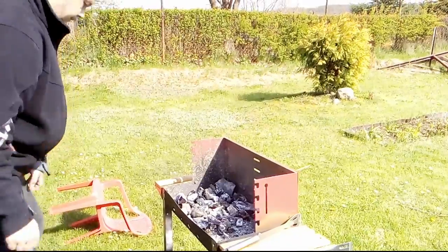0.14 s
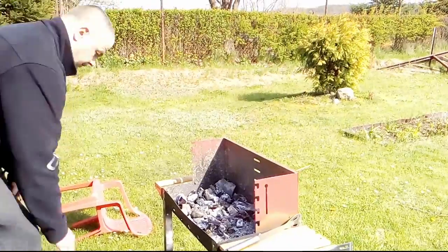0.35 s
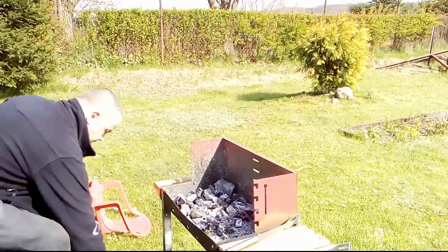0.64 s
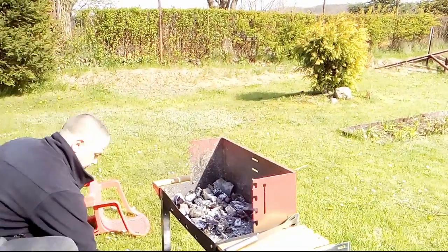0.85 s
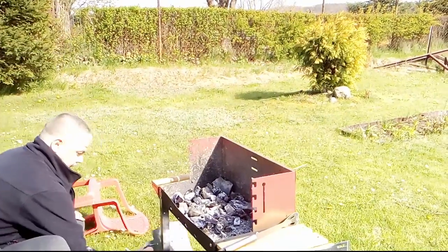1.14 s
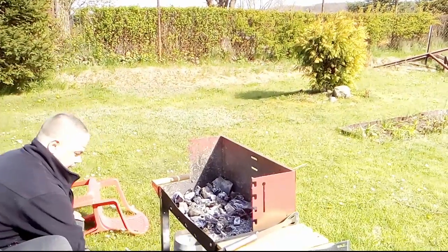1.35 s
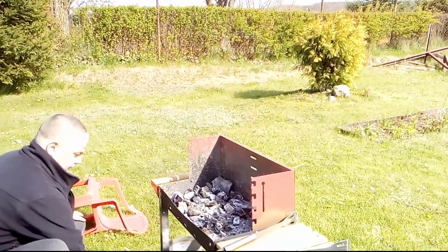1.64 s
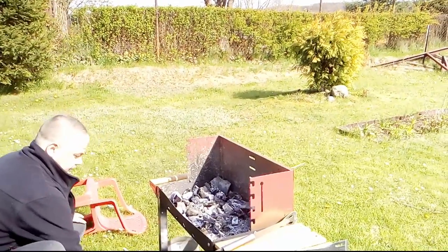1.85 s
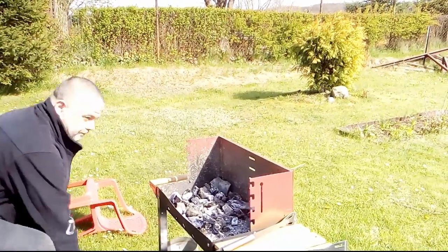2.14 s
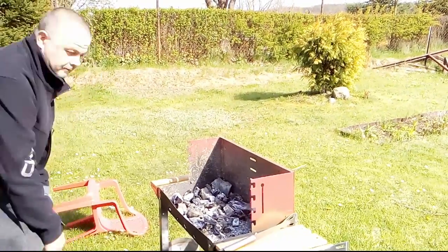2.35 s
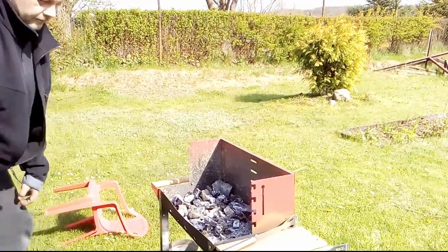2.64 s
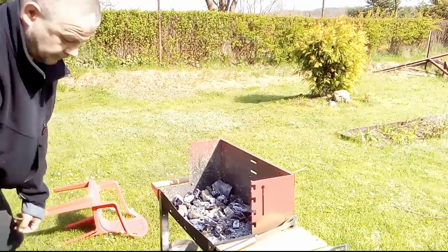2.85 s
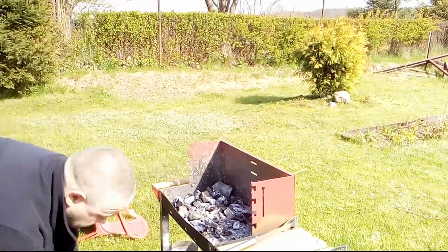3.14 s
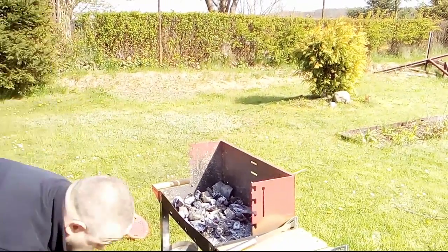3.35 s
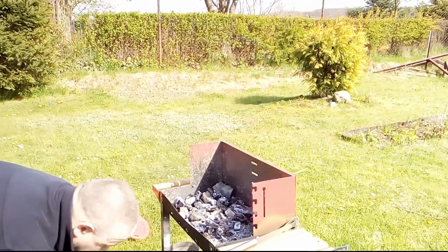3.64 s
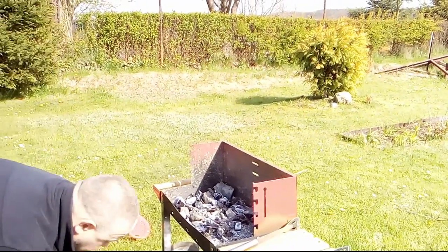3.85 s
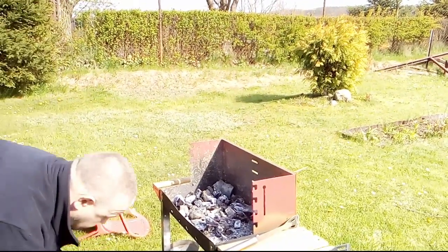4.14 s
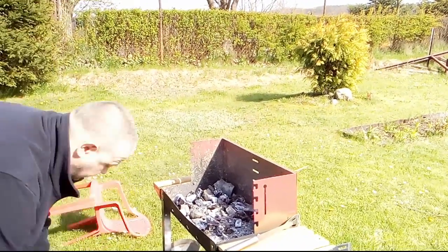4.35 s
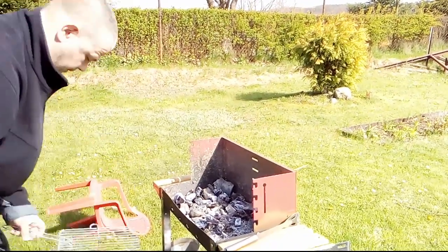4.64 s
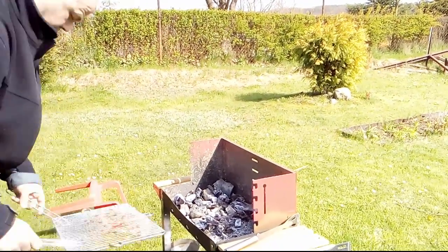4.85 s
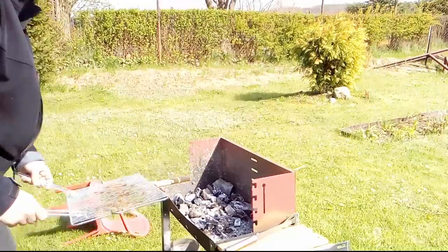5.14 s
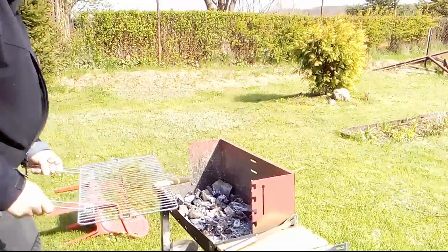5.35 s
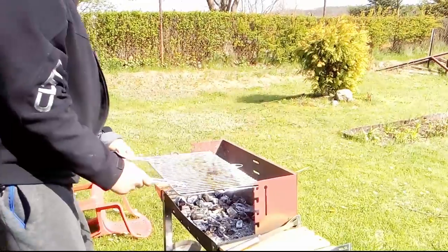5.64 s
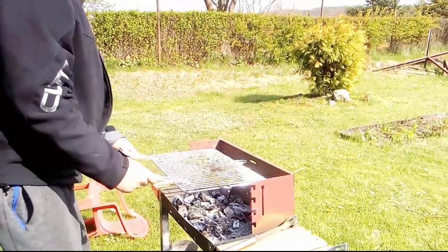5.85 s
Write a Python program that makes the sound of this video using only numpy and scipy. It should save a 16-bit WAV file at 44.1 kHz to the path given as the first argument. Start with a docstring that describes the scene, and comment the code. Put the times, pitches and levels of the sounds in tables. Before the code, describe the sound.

A metal tool pushes clattering charcoal around a steel grill outdoors, with wind bumps, a faint bird and a wire grate rattling.

```python
"""A steel grill on a lawn, heard through one small microphone in the open air.
For the first three seconds a metal tool pushes charcoal about: shoves clatter in the hollow pan,
brittle lumps and steel knock together, embers tick. Puffs of wind bump the microphone, hardest
about one second in. As the tool comes to rest, a small bird whistles far off.
Near five seconds a wire grate is picked up, and its loose wires chatter."""
import sys
import numpy as np
from scipy import signal
from scipy.fft import rfft, irfft, next_fast_len
from scipy.io import wavfile
from scipy.ndimage import uniform_filter1d

SR = 44100
rng = np.random.default_rng(int(sys.argv[2]) if len(sys.argv) > 2 else 0)


def file_out(sig):
    """Save sig as 16-bit WAV at sys.argv[1]."""
    # one column per channel
    cols = np.atleast_2d(sig).T
    # limit, then scale
    lim = np.clip(cols, -1, 1)
    pcm = np.round(lim * 32767).astype(np.int16)
    wavfile.write(sys.argv[1], SR, pcm)


N = 264159
TIME = np.arange(N) / SR

# shoves of the tool in the pan: start_s, level_db, tilt_db_per_octave, crack_db, t60_s
SHOVES = [(.007, -43, -1.6, -2, 0.32), (.0398, -33.5, -0.5, 15.5, 0.18), (.0905, -34.5, 2.5, 12, 0.09),
          (.101, -36.5, 3.5, 0, 0.14), (.306, -48, -3.7, 2, 0.38), (.3355, -35.5, 0.5, 13, 0.1),
          (.378, -37.5, 6, 18, 0.062), (.493, -56.5, -5.5, 13, 0.053), (.834, -49, -1, 20.5, 0.11),
          (.850, -49, -6, 12, 0.049), (.872, -39, .5, 15, 0.1), (1.442, -53.5, -3.5, -6, 0.13),
          (2.972, -47.5, -0.5, 10, 0.13), (3.108, -46.5, -3.5, 9, 0.054)]
# sharp knocks of lumps and steel: start_s, level_db, tilt_db_per_octave, crack_db, t60_s
KNOCKS = [(.280, -41, -0.8, 9, 0.11), (.616, -40, -1.2, 12, 0.038), (1.2168, -39.5, -1.3, 9, 0.086),
          (1.222, -42.5, 1, -4, .13), (1.5328, -42.5, -.6, 15, 0.1), (2.0465, -55.5, 7, 16, 0.06),
          (2.052, -41.5, -2, 5, 0.14), (2.4365, -43.5, 0.7, 0, 0.17), (2.460, -50.5, -6, 0, 0.18),
          (2.8665, -27.5, 2, 5, 0.1), (2.872, -29.5, 0.9, -2, 0.11), (2.881, -32, -0.7, -3, .11)]
# lumps sliding over each other: start_s, length_s, level_db
SLIDES = [(.03, 0.05, -52), (.30, 0.086, -51), (.63, 0.14, -52), (.83, 0.039, -52.5), (2.47, 0.11, -63),
          (4.35, 0.03, -62.5), (5.91, 0.048, -59.5)]
# lumps that clink when struck: start_s, pitch_hz, level_db
CLINKS = [(0.0408, 1160, -37), (0.0901, 1620, -34), (1.2155, 2410, -39), (2.052, 1980, -39),
          (2.8652, 2060, -33.5)]
# ticks of the embers: start_s, level_db
EMBER_TICKS = [(.177, -56), (.532, -53.5), (.697, -44.5), (1.3695, -49), (1.400, -51.5), (3.1515, -48)]
# resonances of the hollow pan: pitch_hz, width_hz, gain_db
PAN_MODES = [(353, 24, 0), (583, 48, 2), (965, 87, -5), (1067, 73, 4.5), (1290, 120, -3.5), (1550, 120, -4),
             (1990, 39, -3), (3130, 59, 2.5), (3610, 120, 6), (4260, 120, -8)]
# resonances of its steel walls; the last row is the microphone's thin treble peak, heard on the knocks:
# pitch_hz, width_hz, gain_db
KNOCK_MODES = [(590, 33, 9), (1559, 51, 5.5), (2010, 64, 5.5), (2896, 110, 6), (3360, 110, 1.5),
               (3635, 90, 7.5), (4020, 67, 7), (4280, 63, 1), (4940, 110, 4), (15100, 910, 2)]
# spectrum of sliding charcoal: frequency_hz, gain_db
SLIDE_COLOUR = [(200, -35), (500, 9.5), (1200, 8.5), (3000, 7), (5000, 2), (8000, -5), (15000, 0.5)]

# bumps of the grate, lifted and set on: start_s, level_db, tilt_db_per_octave, crack_db, t60_s
GRATE_BUMPS = [(4.9545, -39, -3, 11, .066), (4.9575, -26.5, -2, 6, 0.047), (4.960, -23, 0.6, 10.5, 0.049),
               (4.965, -32, 3, 3, 0.14), (5.103, -48.5, -.3, 12, 0.12), (5.735, -54, -2, 0, 0.078),
               (5.7655, -47.5, -4, 16, 0.099)]
# its loose wires chattering: start_s, level_db
WIRE_CHATTER = [(5.0055, -43.5), (5.013, -48), (5.027, -53), (5.058, -56), (5.073, -53), (5.094, -53),
                (5.114, -48), (5.123, -52)]
# resonances of the grate: pitch_hz, width_hz, gain_db
GRATE_MODES = [(533, 41, 7), (1650, 200, 5), (1950, 72, -7), (2940, 88, 0), (3450, 96, 1), (3750, 92, -9),
               (4050, 150, 3.5), (4680, 55, -1), (4800, 110, -9), (5850, 120, -17)]

# the four bands of any contact: low_hz, high_hz, gain_db, t60_factor
CONTACT_BANDS = [(250, 1245, -2.5, 1.35), (1064, 2615, -3, 1.36), (2660, 6130, -2, 1.07),
                 (7600, 24000, 8.5, 0.56)]
# colour of each kind of contact in those bands: low_db, mid_db, high_db, top_db
SHOVE_COLOUR = (-4, 0, -10.5, -29)
KNOCK_COLOUR = (-8.5, -1, 1, -11.5)
TICK_COLOUR = (-28, -8, -4.5, -4)
BUMP_COLOUR = (-17.5, -7, -1.5, -12)
CHATTER_COLOUR = (-18, -13, 1, -11)

# puffs of wind on the microphone: start_s, length_s, level_db
PUFFS = [(.53, 0.12, -53.5), (.72, 0.061, -58), (.84, 0.069, -37), (.94, 0.027, -48.5),
         (1.025, 0.0099, -40.5), (1.12, 0.17, -64), (2.105, 0.01, -57), (2.82, 0.02, -50),
         (2.95, 0.21, -53.5), (3.17, 0.34, -61.5), (3.32, 0.065, -55.5), (3.68, 0.039, -63.5),
         (4.1, 0.31, -68), (4.71, 0.059, -61.5), (5.365, 0.027, -58)]
# the hardest eddies buffeting its port: start_s, level_db, pitch_hz
BUFFETS = [(0.889, -22, 113), (1.012, -25, 430), (1.028, -21, 168), (1.0498, -16, 312), (1.054, -23.5, 123),
           (2.947, -35.5, 207), (3.335, -37.5, 115)]
# spectrum of the wind's rumble: frequency_hz, gain_db
WIND_COLOUR = [(25, -37), (50, -17), (80, 0), (115, 2), (170, -2), (260, -11.5), (450, -26), (800, -29),
               (2000, -58)]

# the distant bird's falling whistles: start_s, level_db
WHISTLES = [(3.163, -60.5), (3.696, -57)]
# its higher, warbled notes: start_s, pitch_hz, level_db
HIGH_NOTES = [(2.88, 4720, -59.5), (3.471, 4680, -60.5), (3.995, 4740, -63)]
# spectrum of still garden air: frequency_hz, gain_db
AIR_COLOUR = [(25, -1.5), (50, 11.5), (100, 5), (200, 10.5), (400, 9), (800, 6.5), (1600, 3), (3200, 1),
              (6000, -0.5), (15000, -0.5)]
# response of the microphone: frequency_hz, gain_db
MICROPHONE = [(5500, 0), (6600, 0.5), (7300, -6.5), (8200, -12), (10500, -13), (13000, -12), (14000, -4.5),
              (14900, -2.5), (15500, 2), (15900, -35)]


def charcoal():
    """At the grill: shoves sound the hollow pan, knocks its steel walls; lumps slide and embers tick."""
    sliding = swells(SLIDES, rise_db_per_s=600, fall_db_per_s=302)
    slides = sliding * rms_one(coloured(grains(spread_db=3.5), SLIDE_COLOUR))
    shoves = contacts(SHOVES, SHOVE_COLOUR, crack_db=-17.5, crack_t60=0.022, shower_db=-6.5, spread_db=1)
    knocks = contacts(KNOCKS, KNOCK_COLOUR, crack_db=-13.5, crack_t60=0.021, shower_db=-5, spread_db=2)
    ticks = contacts(clicks(EMBER_TICKS, hard_db=5.5, t60=0.028), TICK_COLOUR,
                     crack_db=-5, crack_t60=0.011, shower_db=-3.5, spread_db=0.5)
    pan = resonate(shoves, PAN_MODES, ring_db=4)
    ringing_knocks = resonate(knocks, KNOCK_MODES, ring_db=-1)
    return slides + pan + ringing_knocks + clinks() + ticks


def clinks():
    """A struck lump rings briefly in a cluster of close modes around its pitch."""
    width_octaves, t60 = 0.24, 0.076
    age = TIME[:SR // 4]
    out = np.zeros(N)
    for start_s, pitch_hz, level_db in CLINKS:
        at = round(start_s * SR)
        edges_hz = pitch_hz * 2 ** (width_octaves * np.array([-0.5, 0.5]))
        force = rng.standard_normal(len(age)) * from_db(level_db - 60 * age / t60)
        band = signal.butter(2, edges_hz, "band", fs=SR, output="sos")
        out[at:at + len(age)] += signal.sosfilt(band, force) * np.sqrt(SR / 2 / np.ptp(edges_hz))
    return out


def grate():
    """Bumps and chattering wires ring the same grate."""
    bumps = contacts(GRATE_BUMPS, BUMP_COLOUR,
                     crack_db=-6.5, crack_t60=0.0081, shower_db=-3, spread_db=-0.5)
    wires = contacts(clicks(WIRE_CHATTER, hard_db=15, t60=0.043), CHATTER_COLOUR,
                     crack_db=-6.5, crack_t60=0.0096, shower_db=-3.5, spread_db=2)
    return resonate(bumps + wires, GRATE_MODES, ring_db=2.5)


def contacts(rows, colour, crack_db, crack_t60, shower_db, spread_db):
    """Each contact is a brief hard crack and a shower of micro-impacts that dies fastest in the treble."""
    tilt_pivot_hz = 2500
    out = np.zeros(N)
    for k, (low_hz, high_hz, gain_db, t60_factor) in enumerate(CONTACT_BANDS):
        high_hz = min(high_hz, 0.45 * SR)
        octaves = np.log2(np.sqrt(low_hz * high_hz) / tilt_pivot_hz)
        power = np.zeros(N)
        for start_s, level_db, tilt, hard_db, t60 in rows:
            at = max(round(start_s * SR), 0)
            age = TIME[:min(SR // 2, N - at)]
            band_db = level_db + colour[k] + tilt * octaves
            crack = from_db(band_db + hard_db + crack_db - 60 * age / crack_t60)
            shower = from_db(band_db + shower_db - 60 * age / max(t60 * t60_factor, 0.005))
            power[at:at + len(age)] += crack ** 2 + shower ** 2
        force = np.sqrt(power) * grains(spread_db) + 1e-18
        band = signal.butter(3, [low_hz, high_hz], "band", fs=SR, output="sos")
        gain = from_db(gain_db) * np.sqrt(SR / 2 / (high_hz - low_hz))
        out += (-1) ** k * gain * signal.sosfilt(band, force)   # neighbouring bands alternate in sign
    return out


def clicks(rows, hard_db, t60):
    """Rows for small contacts that differ only in time and strength."""
    return [(start_s, level_db, 0, hard_db, t60) for start_s, level_db in rows]


def grains(spread_db):
    """Dense micro-impacts of uneven size, rms 1."""
    sizes = from_db(spread_db * np.clip(drift(500), -2, 2))
    return rms_one(rng.standard_normal(N) * sizes)


def resonate(force, modes, ring_db):
    """The direct sound plus the ring of each resonance."""
    out = force.copy()
    for pitch_hz, width_hz, gain_db in modes:
        radius = np.exp(-np.pi * width_hz / SR)
        poles = [1, -2 * radius * np.cos(2 * np.pi * pitch_hz / SR), radius ** 2]
        ring = signal.lfilter([1, 0, -1], poles, force + 1e-18) * (1 - radius ** 2) / 2
        out += from_db(gain_db + ring_db) * ring
    return out


def wind():
    """Right on the microphone: eddies rumble at the port, the hardest as single damped swings."""
    eddies = coloured(rng.standard_normal(N), WIND_COLOUR)
    eddies /= np.sqrt(uniform_filter1d(eddies ** 2, size=1100) + 1e-12)   # even out the level
    breeze = from_db(-73.5 + 4 * drift(16))
    puffs = swells(PUFFS, rise_db_per_s=330, fall_db_per_s=275)
    out = eddies * np.hypot(breeze, puffs)
    for start_s, level_db, pitch_hz in BUFFETS:
        cycles = pitch_hz * np.maximum(TIME - start_s, 0)
        decay_db = np.minimum(60 * cycles / 7, 200)   # dies away in seven cycles
        out += np.sin(2 * np.pi * cycles) * from_db(level_db - decay_db)
    out = signal.sosfilt(signal.butter(3, 60, "high", fs=SR, output="sos"), out)
    return signal.sosfilt(signal.butter(5, 680, fs=SR, output="sos"), out)


def bird():
    """Far off: whistles that fall and level out, between higher warbled notes that sag a little."""
    from_hz, to_hz, glide_s, whistle_s = 3920, 3255, 0.017, 0.23
    sag_hz_per_s, high_note_s = 1410, 0.105
    out = np.zeros(N)
    for start_s, level_db in WHISTLES:
        age = np.clip(TIME - start_s, 0, whistle_s)
        pitch_hz = to_hz + (from_hz - to_hz) * np.exp(-age / glide_s)
        out += bird_note(age, whistle_s, pitch_hz, level_db, warble=0.0035)
    for start_s, pitch_hz, level_db in HIGH_NOTES:
        age = np.clip(TIME - start_s, 0, high_note_s)
        out += bird_note(age, high_note_s, pitch_hz - sag_hz_per_s * age, level_db, warble=0.018)
    return out


def bird_note(age, length_s, pitch_hz, level_db, warble):
    """One near-sine note swells, fades and stops; its level trembles over the distance."""
    attack_s, release_s, fade_db_per_s = 0.041, 0.015, 71
    sounding = np.clip(np.minimum(age / attack_s, (length_s - age) / release_s), 0, 1)
    phase = 2 * np.pi * np.cumsum(pitch_hz * (1 + warble * drift(250))) / SR
    gain = from_db(level_db - fade_db_per_s * age + 2 * drift(40))
    return np.sqrt(2) * np.sin(phase) * sounding * gain


def garden(sound, echo_db, t60):
    """Around the lawn, hedge and house walls scatter back a dull tail."""
    age = TIME[:SR // 2]
    onset = 1 - np.exp(-age / 0.004)
    tail = rng.standard_normal(len(age)) * from_db(-60 * age / t60) * onset
    tail = signal.sosfilt(signal.butter(1, 3500, fs=SR, output="sos"), tail)
    tail /= np.sqrt(np.sum(tail ** 2))
    return sound + from_db(echo_db) * signal.fftconvolve(sound, tail)[:N]


def garden_air():
    """Behind everything, the faint steady hiss of the open air."""
    return from_db(-58) * rms_one(coloured(rng.standard_normal(N), AIR_COLOUR))


def swells(rows, rise_db_per_s, fall_db_per_s):
    """Gain of events that rise up to their start, hold for their length and fall away."""
    power = np.zeros(N)
    for start_s, length_s, level_db in rows:
        before_db = rise_db_per_s * np.maximum(start_s - TIME, 0)
        after_db = fall_db_per_s * np.maximum(TIME - start_s - length_s, 0)
        power += from_db(level_db - np.minimum(before_db + after_db, 100)) ** 2
    return np.sqrt(power)


def coloured(sound, points):
    """Causal (minimum-phase) filter through points of frequency_hz, gain_db."""
    size = 2 * next_fast_len(N // 2 + 4096)
    hz, db = np.transpose(points)
    grid_hz = np.maximum(np.arange(size // 2 + 1) * SR / size, 1)
    gain = from_db(np.interp(np.log(grid_hz), np.log(hz), db))
    cepstrum = irfft(np.log(gain))
    cepstrum[1:size // 2] *= 2
    cepstrum[size // 2 + 1:] = 0
    return irfft(rfft(sound, size) * np.exp(rfft(cepstrum)))[:N]


def drift(points_per_s):
    """A line wandering through random points, rms 1."""
    return rms_one(np.interp(TIME * points_per_s, np.arange(4096), rng.standard_normal(4096)))


def from_db(db):
    return 10 ** (np.asarray(db) / 20)


def rms_one(x):
    return x / np.sqrt(np.mean(x ** 2) + 1e-20)


def scene():
    """From the lawn, in mono: the grill almost dry, the far bird with more echo, then wind and air."""
    air = garden_air()
    grill = garden(charcoal() + grate(), echo_db=-23, t60=0.25)
    far_bird = garden(bird(), echo_db=-5.5, t60=0.37)
    return (grill + far_bird + wind() + air)[None]


def record(dry):
    """A small microphone with a hollow in the treble and a peak above it; the top is cut."""
    heard = coloured(dry[0], MICROPHONE)
    top_cut = signal.ellip(10, 0.1, 80, 16300, fs=SR, output="sos")
    return signal.sosfilt(top_cut, heard)[None]


dry = scene()
out = record(dry)
file_out(out)
```